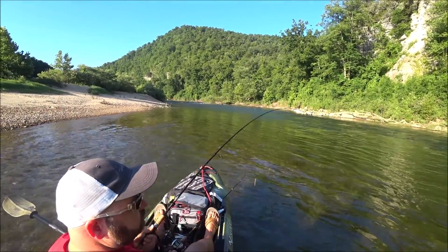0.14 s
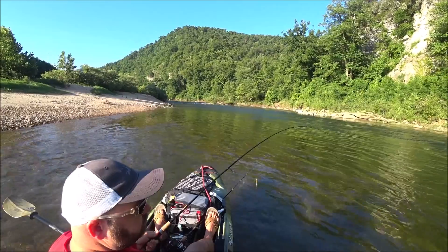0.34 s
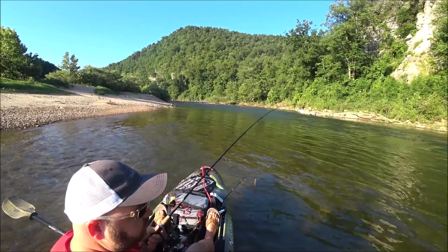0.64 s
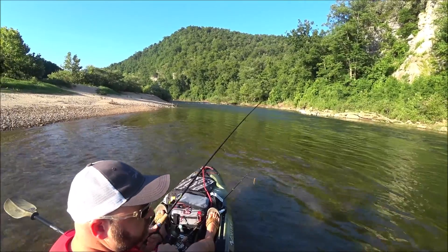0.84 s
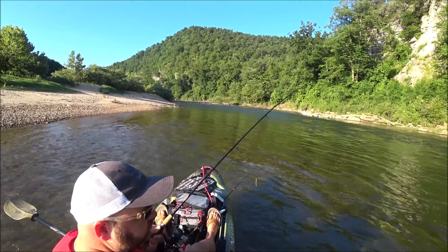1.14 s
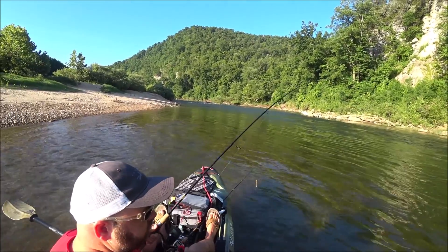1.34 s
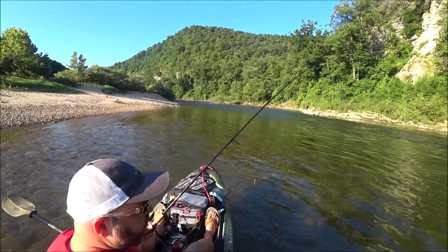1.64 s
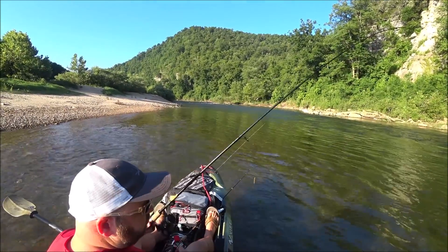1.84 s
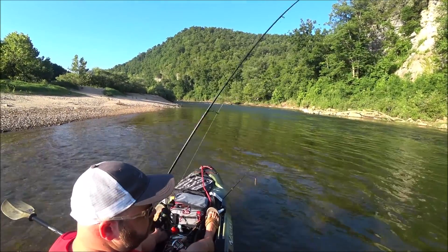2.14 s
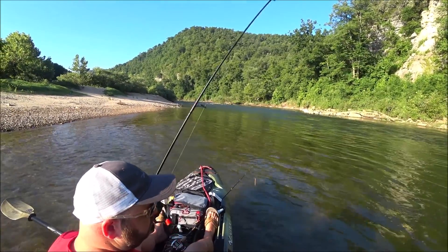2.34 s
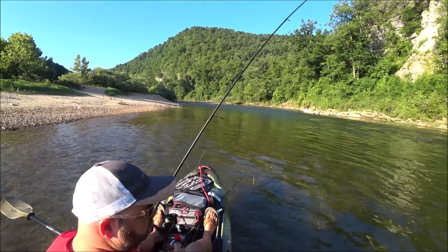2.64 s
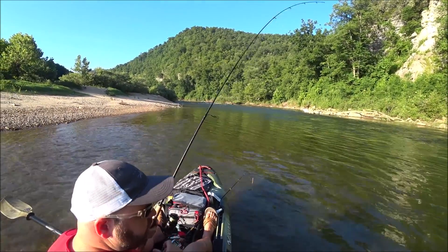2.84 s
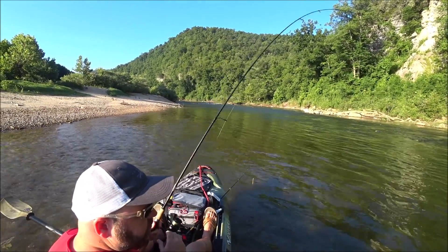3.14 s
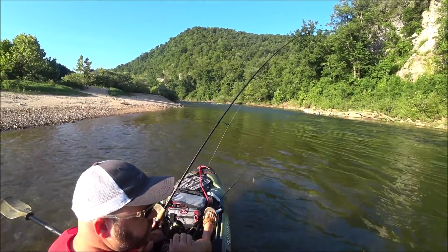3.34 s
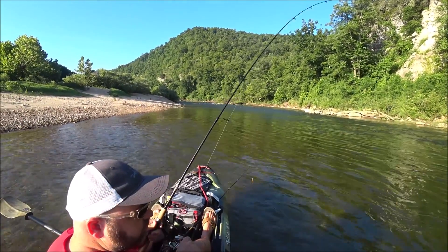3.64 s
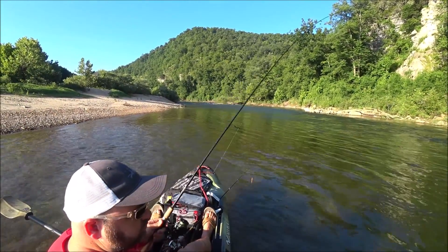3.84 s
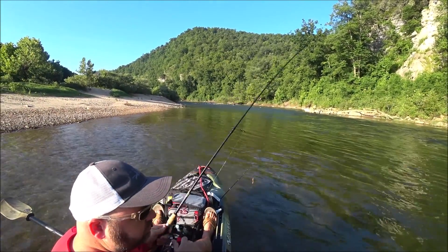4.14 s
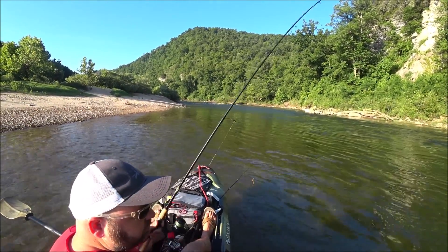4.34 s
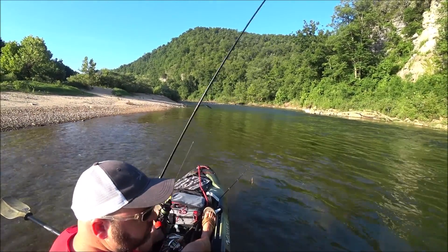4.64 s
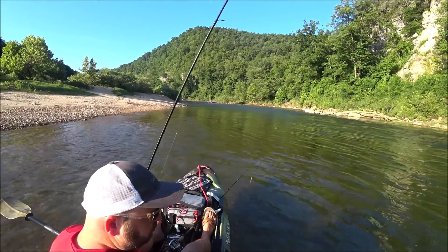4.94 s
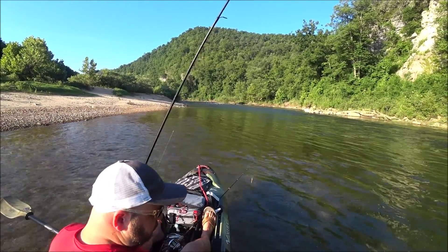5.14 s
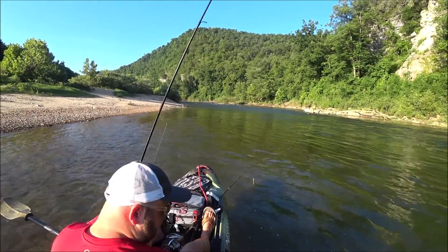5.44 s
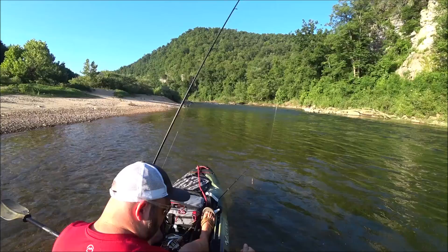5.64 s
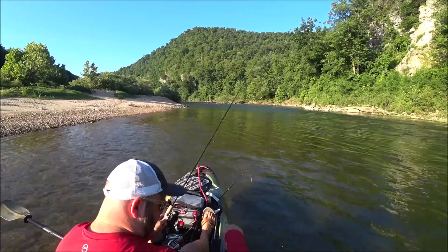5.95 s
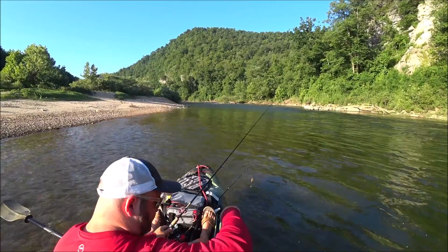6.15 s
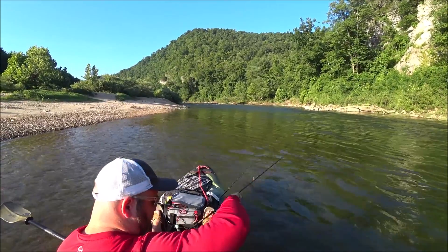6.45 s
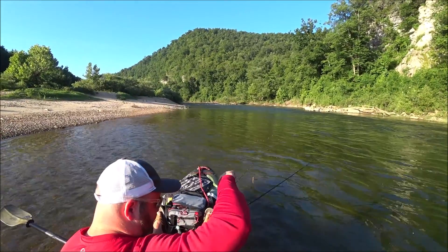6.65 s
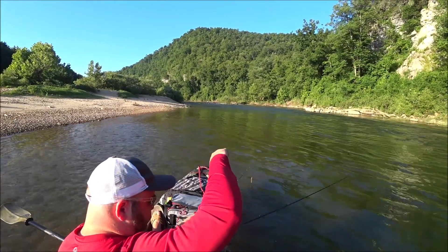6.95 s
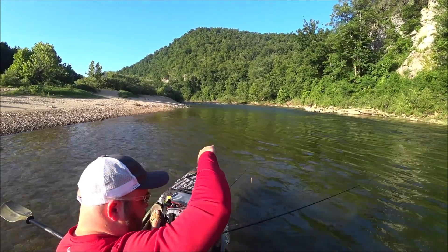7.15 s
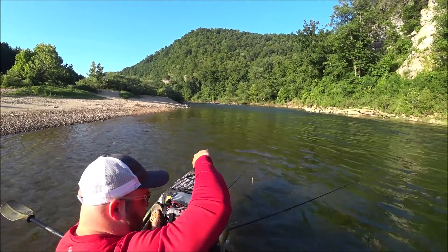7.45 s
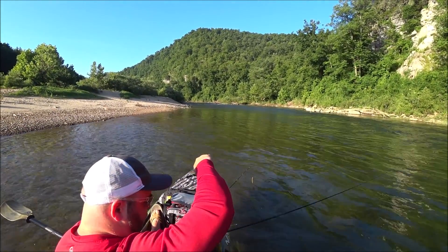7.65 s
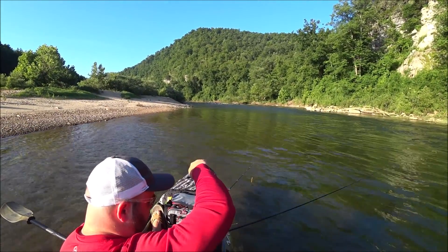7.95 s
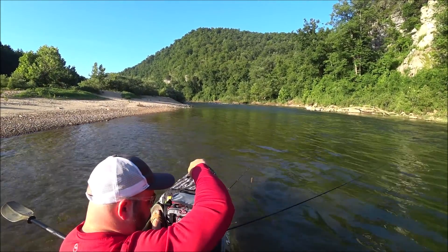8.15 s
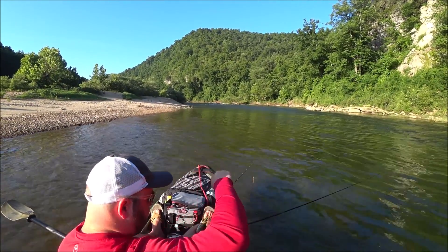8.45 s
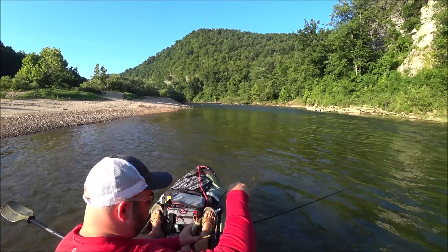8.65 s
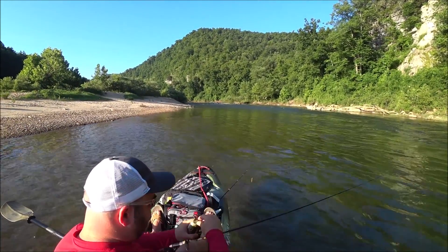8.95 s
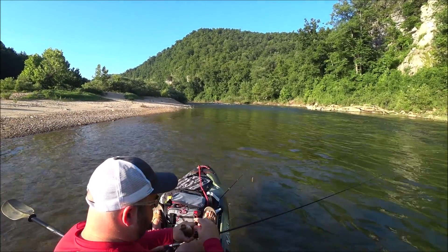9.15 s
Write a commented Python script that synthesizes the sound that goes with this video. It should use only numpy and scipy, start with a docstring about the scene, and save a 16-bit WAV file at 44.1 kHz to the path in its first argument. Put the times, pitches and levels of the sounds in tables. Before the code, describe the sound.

Shallow river water rushes around a kayak, a reel whirrs briefly, then a hooked fish thrashes and splashes, with dull hull knocks.

```python
"""First you hear shallow water rushing and insects droning in the trees, around an angler's plastic kayak.
Dull knocks ring the hull, the reel whirrs for a few turns and far birds peep. Then a hooked fish thrashes
beside the boat: the water foams, slaps and traps air that rings as bubbles. Drips and more knocks follow.
The two microphone ports are wired against each other, so left and right mostly swing opposite ways."""
import sys
import numpy as np
from scipy import signal
from scipy.fft import rfft, irfft
from scipy.io import wavfile
from scipy.ndimage import uniform_filter1d

SR = 44100
rng = np.random.default_rng(int(sys.argv[2]) if len(sys.argv) > 2 else 0)


def store_pcm(level_fs):
    """Save levels as 16-bit WAV."""
    pcm = np.round(np.clip(level_fs, -1, 1) * 32767).astype(np.int16)
    wavfile.write(sys.argv[1], SR, np.atleast_2d(pcm).T)


N = 410571

# Tone of the rushing water. Each row: frequency in Hz, relative level in dB.
RIFFLE_TONE = [(40, -53), (100, -36), (200, -26.5), (350, -9.5), (600, -3.5), (1000, 1.5), (1400, -3.5),
               (2200, -9.5), (3300, -14), (4200, -17.5), (5800, -20), (7500, -24.5), (9000, -29.0),
               (11000, -28.5)]
# Insect wing resonances. Each row: pitch in Hz, width in Hz, level in dB.
INSECT_BANDS = [(4663, 390, -65.5), (4907, 310, -65), (5306, 400, -66.5)]
# Water and weight working on the hull. Each row: time in seconds, level in dB.
RUMBLE_LEVELS = [(0, -92), (3.8, -99), (4.1, -76), (4.4, -106), (5.6, -82), (5.75, -64), (5.9, -72),
                 (6.2, -89), (6.5, -82), (6.7, -87), (6.95, -76.5), (7.1, -76), (7.4, -91), (8.6, -98),
                 (8.95, -81), (9.31, -89)]
# Slaps and drops hitting water. Each row: start in seconds, level in dB, centre in Hz, length in seconds.
SLAPS = [(0.464, -54, 7700, 0.0088), (3.375, -50, 2340, 0.0055), (4.258, -40.5, 2180, 0.019),
         (4.352, -42, 3000, 0.0048), (4.404, -38, 2200, 0.018), (4.434, -39, 3500, 0.0034),
         (4.506, -38.5, 3440, 0.0046), (4.515, -39.5, 1850, 0.013), (4.646, -29, 7040, 0.0033),
         (4.717, -35, 3680, 0.0027), (4.766, -35, 3130, 0.028), (4.821, -38.5, 7050, .0055),
         (4.875, -43, 7900, 0.0046), (4.969, -34.5, 4650, 0.0095), (4.982, -35.5, 3900, 0.0058),
         (5.028, -36.5, 5660, 0.038), (5.047, -28.5, 2850, 0.018), (5.076, -36.5, 3750, .025),
         (5.106, -30, 2780, 0.0026), (5.177, -26, 2450, 0.0038), (5.185, -33.5, 6800, 0.003),
         (5.218, -27.5, 1910, 0.0051), (5.263, -31, 2600, 0.012), (5.331, -31.5, 3370, 0.0061),
         (5.42, -27, 6450, 0.0031), (5.496, -36, 1970, .0065), (5.543, -33, 5800, 0.0037),
         (5.567, -35, 1670, .0055), (5.717, -23.5, 2860, 0.0029), (5.722, -31, 4620, 0.022),
         (5.785, -28.5, 4460, 0.0055), (5.828, -24.5, 2030, 0.014), (5.835, -33.5, 4600, 0.019),
         (5.871, -26.5, 5770, 0.0028), (5.88, -37, 5330, 0.0069), (5.913, -37, 4200, 0.0038),
         (5.939, -36.5, 2960, 0.023), (5.96, -35, 2480, .005), (5.984, -34.5, 6060, 0.0028),
         (5.998, -24.5, 3550, 0.0039), (6.046, -40, 6000, 0.004), (6.258, -44, 4200, 0.0034),
         (6.464, -40.5, 2200, 0.012), (7.051, -50, 6000, 0.0024), (7.2, -45, 4950, 0.0053),
         (7.3, -45.5, 3500, .0065), (7.387, -31, 6160, 0.0025), (7.427, -42.5, 2280, 0.0047),
         (9.065, -48.5, 3860, 0.031)]
# Ringing notes of hull and seat. Each row: pitch in Hz, relative level in dB, seconds to fade by 60 dB.
HULL_NOTES = [(45, -35, 0.088), (108, -32, 0.12), (254, -11, 0.21), (570, 2, 0.062), (657, 4.5, 0.052),
              (730, 3, 0.039), (806, 1.5, 0.046), (1020, -5, 0.03), (1256, -2, .025)]
# Blows on the hull. Each row: start in seconds, level in dB, favoured pitch in Hz, contact in seconds.
HULL_BLOWS = [(.73, -27.5, 824, .0061), (1.557, -24, 900, 0.0053), (5.74, -24, 110, 0.0077),
              (5.87, -42, 110, .011), (5.99, -47, 110, .0075), (6.248, -33.5, 890, 0.0062),
              (6.467, -37, 250, 0.013), (6.91, -35, 915, 0.0062), (7.053, -26.5, 760, 0.0039),
              (7.065, -29.5, 640, 0.0051), (8.897, -33.5, 810, 0.0046)]
# Turning the reel handle. Each row: time in seconds, whirr level in dB, gear pitch in Hz.
REEL_WINDING = [(.74, -66, 1700), (.8, -59, 1700), (.85, -58.5, 1755), (.92, -53.5, 1820), (.96, -54, 2053),
                (1.01, -61, 1777), (1.06, -54.5, 1606), (1.16, -77, 1580)]
# Resonances of the reel body. Each row: pitch in Hz, width in Hz, relative level in dB.
REEL_BANDS = [(1970, 790, -9), (2890, 130, -11), (3230, 690, -7.5), (4080, 200, -11), (7350, 1800, -9),
              (9600, 800, -16)]
# Ticks of the handle. Each row: start in seconds, level in dB, favoured pitch in Hz.
HANDLE_TICKS = [(.806, -39, 4300), (.884, -35, 3150), (.965, -33.5, 2040), (1.078, -46, 7470)]
# Peeps, mostly far birds. Each row: start in seconds, level in dB, from Hz, to Hz, length in seconds.
PEEPS = [(0.846, -48, 3250, 3610, 0.046), (1.3, -52, 2214, 2020, .097), (1.437, -52, 2180, 2290, 0.056),
         (2.264, -67, 7700, 6500, 0.16), (2.438, -47.5, 8600, 5300, 0.023), (2.515, -65, 7900, 6600, .12),
         (2.79, -61, 7700, 7400, .04), (2.844, -63, 7260, 5760, 0.066), (2.977, -61, 7900, 6960, .018),
         (2.874, -49, 2160, 2100, .013), (3.282, -54, 3340, 3670, 0.047), (3.49, -55.5, 3080, 3170, 0.13),
         (3.621, -45, 3900, 2570, 0.049), (3.764, -43, 2370, 2750, 0.047), (3.831, -44, 2756, 2600, 0.084),
         (4.09, -53, 5230, 6100, 0.042), (6.254, -39.5, 2180, 6400, 0.0098),
         (6.259, -50, 4280, 4220, 0.075), (6.356, -50, 3170, 3360, .013), (6.49, -63, 7080, 7300, 0.038),
         (6.507, -49, 4250, 4280, 0.06), (6.639, -54, 5600, 5200, 0.042), (6.783, -55, 4100, 4070, 0.026),
         (7.004, -50, 3490, 3280, 0.013), (7.175, -49, 8700, 6100, .014), (7.688, -54, 3400, 3120, 0.022),
         (7.916, -48, 3600, 3360, .01), (8.138, -51, 3450, 3300, 0.0095), (8.44, -56, 3350, 3580, 0.018)]
# Water churned by the fish. Each row: time in seconds, level in dB.
CHURN_LEVELS = [(3.1, -71), (3.3, -55.5), (3.55, -61.5), (3.75, -55.5), (3.95, -55.5), (4.25, -53),
                (4.4, -44.5), (4.52, -49.5), (4.58, -60.5), (4.72, -47), (5.0, -45), (5.1, -35.5),
                (5.45, -41.5), (5.6, -46), (5.7, -45), (5.8, -46), (5.9, -42.5), (6.02, -51), (6.4, -66)]
# Tone of the foam. Each row: frequency in Hz, relative level in dB.
FOAM_TONE = [(40, -56), (100, -61), (200, -27.5), (350, -12.5), (600, -1.5), (1000, 2), (1400, -3.5),
             (2200, -0.5), (3300, 0), (4200, -6.5), (5800, -13.5), (7500, -23), (9000, -27.5), (11000, -26)]
# Air pockets closing under water. Each row: start in seconds, level in dB, pitch in Hz.
AIR_POCKETS = [(4.194, -37, 2320), (4.275, -44, 1680), (4.351, -45, 559), (4.505, -46, 2490),
               (4.522, -37.5, 1650), (4.669, -41, 2490), (4.697, -41, 700), (4.735, -42, 616),
               (4.823, -37.5, 1028), (4.885, -36.5, 531), (4.968, -41, 2720), (4.982, -40, 907),
               (5.048, -22.5, 990), (5.086, -33, 706), (5.17, -40, 1040), (5.212, -36, 2480),
               (5.217, -34, 612), (5.261, -25, 2480), (5.262, -27, 580), (5.268, -23, 1620),
               (5.326, -27.5, 700), (5.33, -42, 475), (5.393, -31, 2460), (5.5, -44, 555),
               (5.522, -38, 840), (5.454, -35.5, 1150), (5.517, -33.5, 1510), (5.541, -37.5, 1280),
               (5.575, -32, 908), (5.666, -38, 1364), (5.695, -29, 746), (5.732, -31, 555),
               (5.784, -24, 3140), (5.856, -31.5, 780), (5.856, -33, 2420), (5.882, -31.5, 548),
               (5.998, -26, 4480), (6.006, -33, 1070), (7.303, -43, 2290), (7.337, -44, 2030)]
# How the two ports hear far sounds, near water and the deck. Each row: frequency in Hz,
# likeness from 0 to 1, lead of the left side in radians, right minus left level in dB.
FAR_STEREO = [(60, 0.1, 0.45, 0), (151, 0.15, 0.53, 4.5), (297, 0.8, 2.22, 4.5), (915, 0.9, 2.79, 1),
              (1450, .9, 2.63, 1), (3370, 0.99, 2.2, 1), (4650, 0.98, 1.78, 2), (5840, 0.94, 1.78, 4),
              (10900, 0.42, 0.61, 1.5)]
NEAR_STEREO = [(150, 0.74, 2, 2.4), (507, 0.71, 3.28, 0.91), (1210, 1, 2.29, 1.8), (3320, 0.87, 2.44, 0.78),
               (5000, 0.92, 2.13, 2.1), (7300, 1, 1.26, 5.4), (10900, 0.16, 1.8, 2.1)]
DECK_STEREO = [(100, .7, 3.1, -1), (400, .85, 3.3, 0), (800, .97, 3.55, 0), (1100, .9, 3.4, 0)]


def gain_of(db):
    return 10 ** (np.asarray(db) / 20)


def normalise(x):
    """Scales a signal to an average strength (rms) of 1."""
    return x / np.sqrt(np.mean(x ** 2) + 1e-20)


def at_frequency(table, hz, column=1):
    """Reads a table column between its rows, on a log-frequency axis."""
    columns = np.transpose(table)
    return np.interp(np.log(hz + 1), np.log(columns[0] + 1), columns[column])


def over_time(table, column=1):
    """Reads a column of a time table at every sample."""
    columns = np.transpose(table)
    return np.interp(np.arange(N) / SR, columns[0], columns[column], left=-120, right=-120)


def add(mix, start_s, sound):
    part = mix[round(start_s * SR):][:len(sound)]
    part += sound[:len(part)]


def colour(x, tone):
    """Filters by rows of (Hz, dB), then normalises."""
    gains = gain_of(at_frequency(tone, np.fft.rfftfreq(N, 1 / SR)))
    return normalise(irfft(rfft(x) * gains, N))


def resonate(x, hz, width):
    """Two resonances in a row, gain 1 at the centre."""
    b, a = signal.iirpeak(hz, hz / width, SR)
    return signal.lfilter(b, a, signal.lfilter(b, a, x))


def drift(hz):
    """A random wander that takes hz new turns a second."""
    knots = rng.standard_normal(1000)
    return normalise(np.interp(np.arange(N) / SR * hz, np.arange(1000), knots))


def patchy_noise(patch_db):
    """Hiss with louder and softer patches across time and pitch."""
    real, imag, patches = rng.standard_normal((N // 128 + 5, 257, 3)).T
    patches = normalise(uniform_filter1d(uniform_filter1d(patches, size=5, axis=0), size=12, axis=1))
    spectra = (real + 1j * imag) * gain_of(patch_db * patches)
    return normalise(signal.istft(spectra, nperseg=512, noverlap=384)[1][:N])


def fizz(per_s, low_hz, high_hz, cycles, size_db, rising):
    """Many small bubbles, each a short tone that rises in pitch."""
    out = np.zeros(N)
    for hz in np.geomspace(low_hz, high_hz, 20):
        age = np.arange(int(3 * cycles * SR / hz)) * hz / (SR * cycles)
        ping = age * np.exp(-2.5 * age) * np.sin(2 * np.pi * cycles * (age + rising * age ** 2))
        sizes = gain_of(size_db * np.minimum(rng.exponential(1, N), 4))
        starts = rng.random(N) < per_s / 20 / SR
        out += signal.oaconvolve(sizes * starts, ping / np.linalg.norm(ping))[:N] * np.sqrt(hz)
    return normalise(out)


def glide(from_hz, to_hz, length, rise, fade, rasp, grain_samples):
    """A sliding tone; rise and fade are shares of its length, and rasp makes the level flutter."""
    age = np.arange(int(2.5 * length * SR)) / (length * SR)
    hz = from_hz * (to_hz / from_hz) ** np.minimum(age, 1.1)
    swell = np.sin(np.pi / 2 * np.minimum(age / rise, 1))
    decay = np.exp(-(np.maximum(age - rise, 0) / fade) ** 2)
    jitter = normalise(np.convolve(rng.standard_normal(SR // 2), np.hanning(grain_samples), "same"))
    flutter = (1 + rasp * jitter[:len(age)]) / np.sqrt(1 + rasp ** 2)
    return swell * decay * flutter * np.sin(2 * np.pi * np.cumsum(hz) / SR)


def scattered(x, decay_s):
    """Echoes off water and deck; four paths take turns, as the sources move about."""
    echoes = rng.standard_normal((4, 3000)) * np.exp(-np.arange(3000) / SR / decay_s)
    angle = np.pi * 9 * np.arange(N) / SR + np.pi / 4 * np.arange(4)[:, None]
    paths = x * np.cos(angle) ** 2 * np.sqrt(2 / 3)
    return signal.oaconvolve(paths, echoes / np.linalg.norm(echoes[0]), axes=1)[:, :N].sum(0)


def riffle():
    """Far rush of shallow water with small bubbles standing out of it."""
    rush = patchy_noise(1.46) + 0.16 * fizz(150, 506, 4540, cycles=8.5, size_db=1, rising=0.03)
    return gain_of(-51.5 + 0.39 * drift(hz=1.3)) * colour(rush, RIFFLE_TONE)


def insects():
    """A crowd of singers blurs into noise in a few wing resonances, each throbbing a little."""
    return sum(gain_of(db + 0.71 * drift(hz=30.05))
               * normalise(resonate(rng.standard_normal(N), hz, width)) for hz, width, db in INSECT_BANDS)


def drips():
    """Tiny droplets ring faintly along the hull all the way through."""
    drops = fizz(30, 2200, 7030, cycles=50, size_db=3.5, rising=0.011)
    return gain_of(-73) * colour(drops, [(1500, 4), (3500, 2.5), (8000, -7)])


def rumble():
    """Water and weight work on the hull: lumpy noise around its lowest notes."""
    tone = [(20, -27), (50, -11), (80, -9), (108, 1), (140, -5.5), (260, 1), (400, -37)]
    low = colour(rng.standard_normal(N), tone)
    return gain_of(over_time(RUMBLE_LEVELS) + 3.5 * drift(hz=9)) * low


def slaps():
    """Each slap on the water is a burst of noise that builds, cracks and leaves a short wet tail."""
    out, hz, t = np.zeros(N), np.fft.rfftfreq(4096, 1 / SR) + 1, np.arange(4096) / SR
    lead_s = 0.006
    for (start, db, centre_hz, length), noise in zip(SLAPS, rng.standard_normal((len(SLAPS), 4096))):
        octaves = 0.82 * (length / 0.005) ** 0.13  # longer slaps cover a wider band
        band = np.exp(-0.5 * (np.log2(hz / centre_hz) / octaves) ** 2) / np.sqrt(hz) + 0.00037
        past_peak = t - lead_s - 0.4 * length
        body = np.exp(-(past_peak / (0.3 * length)) ** 2)
        tail = 0.064 * np.exp(np.where(past_peak < 0, past_peak / 0.0016, -past_peak / 0.029))
        crack = 0.14 * np.exp(-(past_peak / 0.00024) ** 2)
        hiss = normalise(irfft(rfft(noise) * band))
        add(out, start - lead_s, gain_of(db) * (body + tail + crack) * hiss)
    return out


def knocks():
    """A blow rings the hull notes that the struck spot favours; a soft contact makes the ring swell."""
    out, t = np.zeros(N), np.arange(SR // 4) / SR
    all_phases = 0.36 * rng.random((len(HULL_BLOWS), len(HULL_NOTES)))
    for (start, db, spot_hz, contact), phases in zip(HULL_BLOWS, all_phases):
        ring = np.zeros(len(t))
        for (hz, note_db, fade_s), phase in zip(HULL_NOTES, phases):
            faded_db = 60 * np.maximum(t - contact, 0) / fade_s
            # Notes away from the struck spot's pitch ring softer, by up to 15 dB.
            off_spot_db = min(25.5 * abs(np.log2(hz / spot_hz)), 15)
            ring += gain_of(note_db - faded_db - off_spot_db) * np.sin(2 * np.pi * (hz * t + phase))
        swell = np.sin(np.pi / 2 * np.minimum(t / contact, 1))
        add(out, start, gain_of(db) * ring * swell)
    return out


def reel():
    """Gear rub and handle ticks ring the reel body; the gears whine at a pitch set by winding speed."""
    rub = gain_of(over_time(REEL_WINDING) + 1.2 * drift(hz=70))
    noise, t = rng.standard_normal(N), np.arange(900) / SR
    gear_tone = np.cos(2 * np.pi * np.cumsum(over_time(REEL_WINDING, column=2)) / SR)
    whine = normalise(signal.oaconvolve(noise, np.hanning(180), "same")) * gear_tone
    out = gain_of(5) * rub * whine
    for hz, width, db in REEL_BANDS:
        drive = rub * noise
        for (start, tick_db, spot_hz), burst in zip(HANDLE_TICKS, noise[:3600].reshape(4, 900)):
            tick = t / 0.001 * np.exp(-t / 0.0036) * burst
            off_spot_db = 9.5 * min(abs(np.log2(hz / spot_hz)), 1.2)
            add(drive, start, gain_of(tick_db - off_spot_db) * tick)
        out += gain_of(db) * np.sqrt(SR / 2 / width) * resonate(drive, hz, width)
    return out


def whistles():
    """Thin peeps, mostly far birds, smeared in time by leaves and bank."""
    out = np.zeros(N)
    for start, db, from_hz, to_hz, length in PEEPS:
        rasp = min(0.26 + 3.6 * abs(np.log2(to_hz / from_hz)), 0.9)  # slides are harsher than held notes
        peep = glide(from_hz, to_hz, length, rise=0.45, fade=0.55, rasp=rasp, grain_samples=45)
        add(out, start, gain_of(db) * peep)
    return out + 0.35 * scattered(out, decay_s=0.02)


def churn():
    """Foam, spray and falling drops swell with the thrashing fish, in quick uneven surges."""
    level_db = uniform_filter1d(over_time(CHURN_LEVELS), size=1500) + 4.03 * drift(hz=24.8)
    foam = patchy_noise(2.85) + 0.37 * fizz(260, 417.5, 2477, cycles=7, size_db=2, rising=0.019)
    drops = patchy_noise(0.94) + 0.5 * fizz(500, 3630, 9760, cycles=5, size_db=3.5, rising=0.034)
    spray = colour(drops, [(2500, -32), (5000, 5.5), (7500, 1), (9000, -3.5), (11000, -4.5)])
    surface_s = 4.25  # the spray grows as the fish breaks the surface
    spray_db = np.interp(np.arange(N) / SR - surface_s, [-0.05, 0.05], [-21.5, -8])
    spray_db += 2.7 * drift(hz=52.3)
    spatter = gain_of(-6.5) * fizz(60, 1300, 7800, cycles=1.9, size_db=6, rising=0.018)
    return gain_of(level_db) * (colour(foam, FOAM_TONE) + gain_of(spray_db) * (spray + spatter))


def bubbles():
    """Each air pocket rings briefly, bends a little in pitch and dies, shaken by the water around it."""
    out = np.zeros(N)
    bends = 1 + 0.053 * rng.uniform(-1.15, 2.8, len(AIR_POCKETS))
    for (start, db, hz), bend in zip(AIR_POCKETS, bends):
        # Larger, lower pockets ring longer; louder ones collapse sooner.
        length = 0.013 * (1000 / hz) ** 0.58 * gain_of(-0.38 * (db + 35))
        ring = glide(hz / bend, hz * bend, length, rise=0.19, fade=1, rasp=0.36, grain_samples=230)
        add(out, start, gain_of(db) * ring)
    return out


def ports(left, other, table):
    """The right port hears a phase-shifted blend of the left and sound that came another way."""
    hz = np.fft.rfftfreq(N, 1 / SR)
    likeness = np.clip(at_frequency(table, hz), 0, 1)
    shift = np.exp(-1j * at_frequency(table, hz, column=2))
    balance = gain_of(at_frequency(table, hz, column=3))
    blend = likeness * rfft(left) + np.sqrt(1 - likeness ** 2) * rfft(other)
    return np.array([left, irfft(balance * shift * blend, N)])


def scene():
    """Mixes far sounds, near sounds and the hull in stereo."""
    birds, hull = whistles(), knocks()
    close = bubbles() + slaps() + reel() + drips()
    far = ports(riffle() + insects() + birds, riffle() + insects() + scattered(birds, 0.0026), FAR_STEREO)
    near = ports(churn() + close, churn() + scattered(close, 0.0029), NEAR_STEREO)
    deck = ports(hull, scattered(hull, 0.0081), DECK_STEREO)
    return far + near + deck + np.array([rumble(), rumble()])


def record(dry):
    """Cuts off the highest treble."""
    low_pass = signal.firwin(511, cutoff=11080, window=("kaiser", 9), fs=SR)
    return signal.oaconvolve(dry, low_pass[None], "same")


dry = scene()
out = record(dry)
store_pcm(out)
```